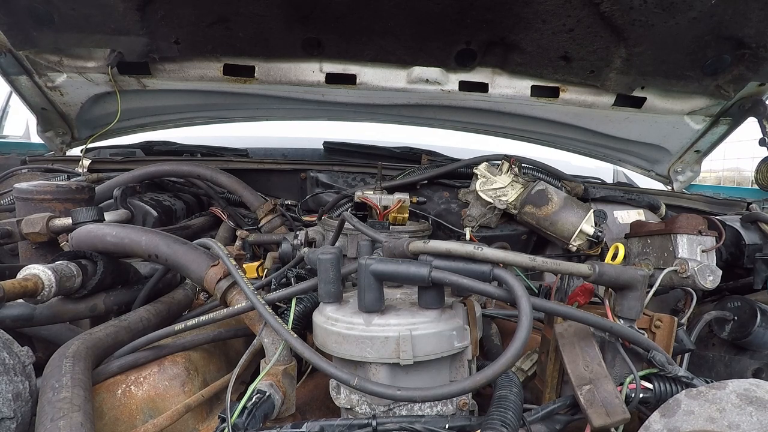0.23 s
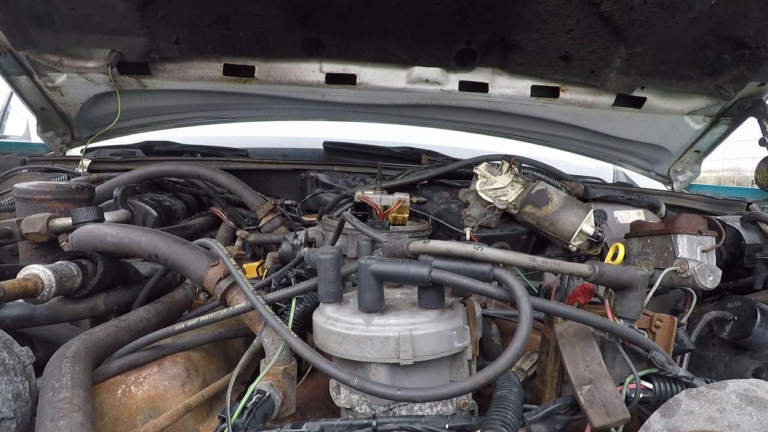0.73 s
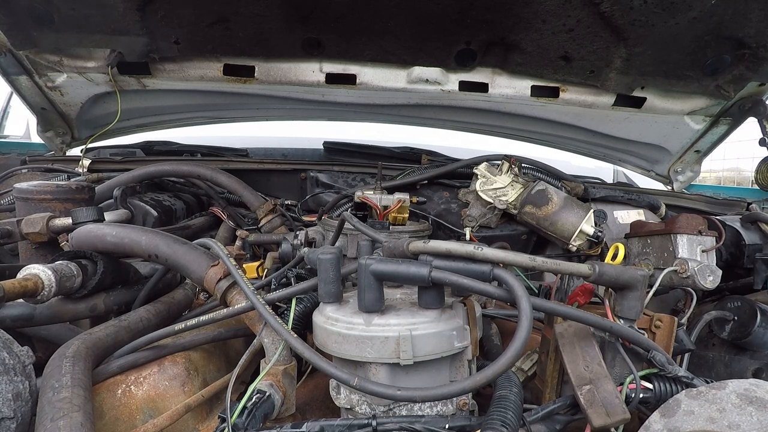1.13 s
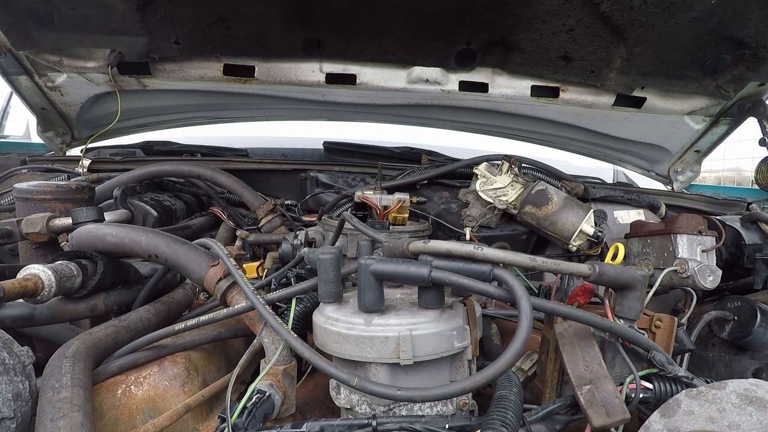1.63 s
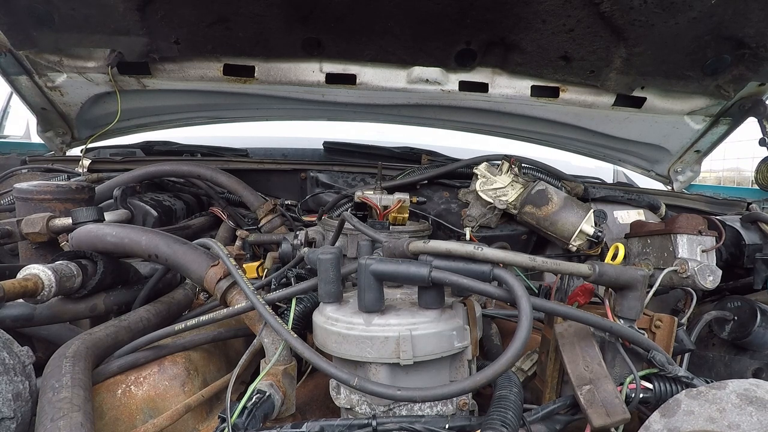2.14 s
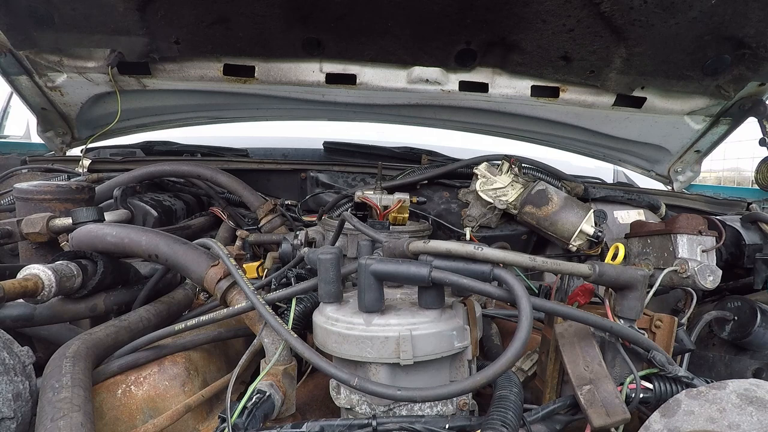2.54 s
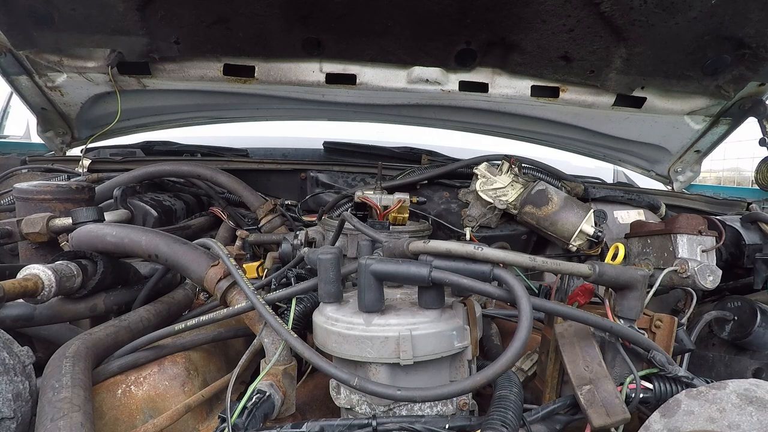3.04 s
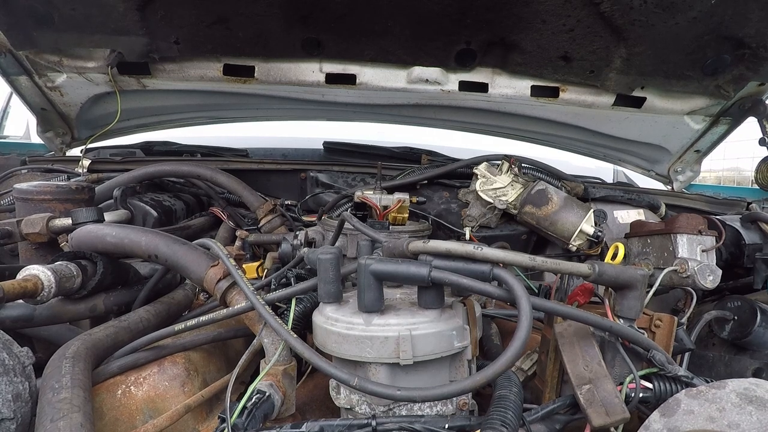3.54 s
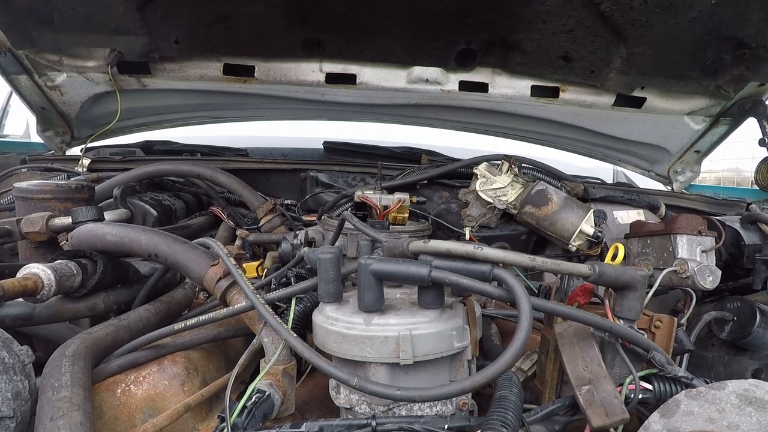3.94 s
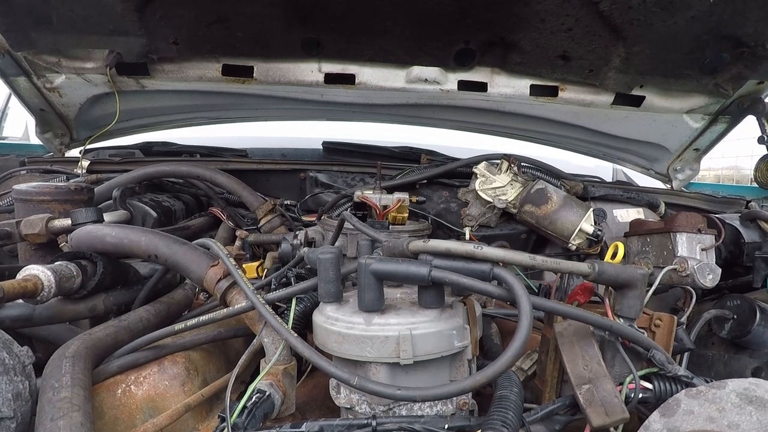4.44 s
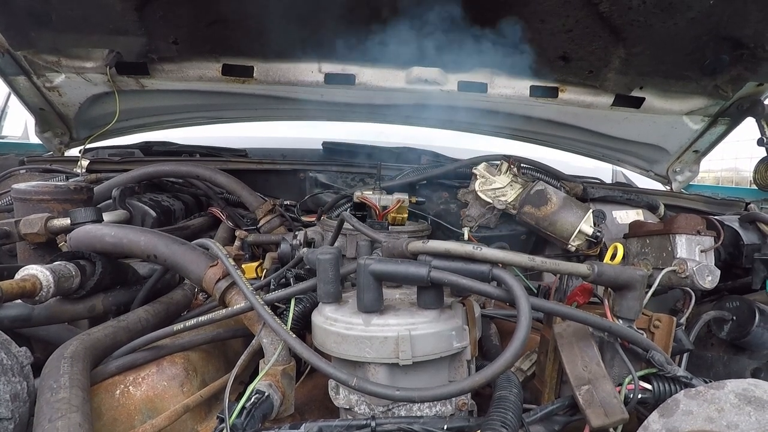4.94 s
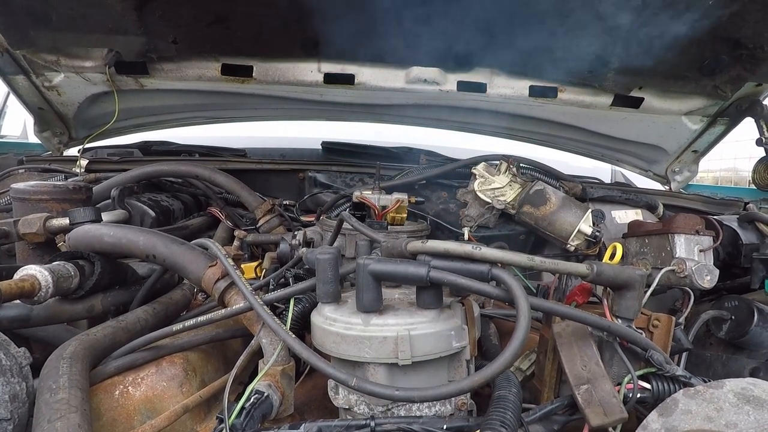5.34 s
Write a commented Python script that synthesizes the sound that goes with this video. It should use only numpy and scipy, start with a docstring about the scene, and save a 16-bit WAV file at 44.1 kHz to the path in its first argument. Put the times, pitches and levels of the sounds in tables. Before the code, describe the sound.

Close in an open engine bay, a blower hums steadily over faint hiss and a fading low rumble. Relays click sharply a few times. At about three seconds a solenoid clunks, the hum sags and the starter grinds, its teeth knocking rapidly in uneven surges. The engine shudders, thuds and spits back through the intake three times, but never catches.

```python
"""An open engine bay: a blower hums over air hiss and a fading rumble (coloured noise), and relays click
(bouncing contacts ring their cases). The starter then cranks a V8 that coughs but will not run: the blower
sags, and pinion teeth knock on the ring gear, faster and slower as cylinders come up on compression or half
fire. Gears grind, the nose rattles, the block shudders, the intake sucks (noise bands) and the exhaust thuds
(damped pressure dips); from 4.5 s the intake spits back three times (noise blasts on low pushes)."""
import sys
import numpy as np
from scipy import signal
from scipy.fft import rfft, irfft, next_fast_len
from scipy.io import wavfile

SR = 44100
rng = np.random.default_rng(int(sys.argv[2]) if len(sys.argv) > 2 else 0)


def store_wav(level_fs):
    """Save 16-bit WAV to argv[1]."""
    pcm = np.round(np.clip(np.atleast_2d(level_fs), -1, 1) * 32767)
    wavfile.write(sys.argv[1], SR, pcm.T.astype(np.int16))


N = 246078
T = np.arange(N) / SR
STARTER_ON_S = 3.057

# cranking noise: (time [s], gear grind level [dB], intake hiss level [dB])
CRANKING_LEVELS = [(3.09, -32, -49), (3.13, -25.5, -47), (3.39, -27.5, -41), (3.54, -30.5, -35),
                   (3.59, -25.5, -31), (3.7, -22.5, -34), (3.77, -30, -58), (3.89, -28.5, -50),
                   (3.97, -32.5, -47.5), (4.16, -36.5, -44), (4.22, -40, -40.5), (4.36, -37, -40),
                   (4.5, -44, -43.5), (4.59, -42.5, -43), (4.78, -56, -39.5), (4.98, -47.5, -45),
                   (5.47, -44.5, -47), (5.51, -50, -42), (5.58, -51.5, -73)]
# modes of the bell housing, before each source scales them: (frequency [Hz], width [Hz], rise [dB])
HOUSING_MODES = [(295, 34, 10), (350, 25, 8.5), (417.9, 12.3, 6.5), (565, 130, 11), (670, 120, -1),
                 (791.6, 49.4, 9.5), (942, 18, 5), (1047, 34, 2.5), (1224, 102, 7.5), (1387, 21, -3),
                 (1484, 294, 0.5), (1689, 49, 6), (2060, 60, 3), (2310, 60, 4), (2490, 94, 8.5),
                 (2656, 40, 6.5), (2775, 93, 8), (2940, 66, 7), (3280, 36, 10.5), (3720, 200, 11),
                 (4210, 360, 8)]


def amp(db):
    """Logarithmic level law: decibels to amplitude gain."""
    return 10 ** (np.asarray(db) / 20)


def rms_one(x):
    """Power normalisation: scales a signal to rms 1."""
    return x / np.sqrt(np.mean(x ** 2) + 1e-20)


def in_time(rows):
    """Linear interpolation: each column of a table at every sample, against its first column of times."""
    s, *columns = np.transpose(rows)
    return [np.interp(T, s, column) for column in columns]


def noise():
    """White noise: independent Gaussian samples of rms 1."""
    return rng.standard_normal(N)


def drift(rate_hz):
    """Low-passed chance: two equal poles leave a slow random signal of rms 1."""
    pole = np.exp(-2 * np.pi * rate_hz / SR)
    settling = SR   # samples discarded while the filter settles
    slow = signal.lfilter([1], [1, -2 * pole, pole * pole], rng.standard_normal(N + settling))
    return rms_one(slow[settling:])


def colour(x, spectrum, peaks=()):
    """Minimum-phase filtering: a broad spectrum with resonant rises; white noise of rms 1 stays at rms 1."""
    size = 2 * next_fast_len(N // 2 + SR // 4)
    hz = np.fft.rfftfreq(size, 1 / SR) + 1   # the offset avoids log(0)
    corner_hz, corner_db = np.transpose(spectrum)
    db = np.interp(np.log(hz), np.log(corner_hz), corner_db)
    for centre_hz, width_hz, rise_db in peaks:
        db = db + rise_db / (1 + (2 * (hz - centre_hz) / width_hz) ** 2)
    cepstrum = irfft(np.log(rms_one(amp(db))), size)
    cepstrum[1:size // 2] *= 2      # folding the cepstrum gives the minimum phase
    cepstrum[size // 2 + 1:] = 0
    return irfft(rfft(x, size) * np.exp(rfft(cepstrum)), size)[:N]


def band(x, order, edges_hz, kind="band"):
    """Butterworth filtering: a pass band without ripple."""
    return signal.sosfilt(signal.butter(order, edges_hz, kind, fs=SR, output="sos"), x)


def ring(x, modes):
    """Modal superposition: each mode is a two-pole resonator that decays by 60 dB in its t60."""
    out = 0
    for hz, level_db, t60 in modes:
        pole, turn = amp(-60 / (t60 * SR)), 2 * np.pi * hz / SR
        poles = [1, -2 * pole * np.cos(turn), pole * pole]
        out = out + amp(level_db) * signal.lfilter([0, np.sin(turn)], poles, x + 1e-18)
    return out


def burst(start, length, rise):
    """Transient envelope: exponential growth over a share of its length, then Gaussian decay."""
    u = np.clip(T - start, 0, None) / length
    return (1 - np.exp(-u / rise)) * np.exp(-u ** 2)


def swell(start, length, early):
    """Squared-sine envelope: an arch over its length, its peak moved early by an exponent below 1."""
    return np.sin(np.pi * np.clip((T - start) / length, 0, 1) ** early) ** 2


def starter_gate():
    """Onset envelope: a linear rise over 19 ms once the starter is switched on."""
    return np.clip((T - STARTER_ON_S) / 0.019, 0, 1)


def held_back():
    """Compression work: the share of crank speed lost builds up to each compression, then lets go."""
    # (slowest moment [s], share of speed lost [0-1])
    compressions = [(3.254, 0.31), (3.38, 0.21), (3.488, 0.2), (4.003, 0.19), (4.109, .17), (5.049, 0.05),
                    (5.237, 0.22), (5.35, 0.14), (5.453, 0.27)]
    slowing_s, recovery_s = .05, .045   # before and after the slowest moment
    lost = 0
    for s, share in compressions:
        distance = np.where(T < s, (s - T) / slowing_s, (T - s) / recovery_s)
        lost = np.maximum(lost, share * (1 - np.clip(distance, 0, 1)))
    return lost


def far_rumble():
    """Low-frequency broadband noise: a rumble outside that fades."""
    # fading: (time [s], level [dB])
    fading = [(0, -53), (1.5, -66), (3.05, -74)]
    # spectrum: (frequency [Hz], relative density [dB])
    spectrum = [(15, 3), (30, -2), (100, -0.5), (130, -18), (600, -102)]
    return amp(in_time(fading)[0]) * colour(noise(), spectrum)


def air():
    """Stationary noise: the faint steady hiss of air and microphone."""
    # spectrum: (frequency [Hz], relative density [dB])
    spectrum = [(1760, -25), (3000, -27), (3380, -9.5), (4820, -8.5), (7600, -7.5), (9830, -9.5),
                (13300, -24), (14500, -66)]
    return amp(-67.5) * colour(noise(), spectrum)


def blower():
    """Duct resonance: turbulent air excites it; the fan sags when the starter draws the battery down."""
    # turbulence: (frequency [Hz], relative density [dB])
    turbulence = [(59, -95), (100, -33), (153, -6.5), (342, -4), (379, -9.5), (432, -4.5), (507, -12.5),
                  (680, -16), (775, -9.5), (1040, -14.5), (1500, -14.5), (2350, -26), (2750, -34.5),
                  (3300, -41), (6000, -61.5)]
    # duct resonances: (frequency [Hz], width [Hz], rise [dB])
    duct = [(174.4, 6.7, 4.5), (245.3, 3.2, 7.5), (440.2, 39, 9), (574, 120, 12), (773, 27, 7),
            (867, 330, 2), (1527, 41, 8.5)]
    level_db, sag_db = -37, -19.5
    sag = np.clip((T - STARTER_ON_S) / 0.16, 0, 1)   # complete in 0.16 s
    unsteady = noise() * amp(0.45 * drift(39))
    return amp(level_db + sag_db * sag) * colour(unsteady, turbulence, duct)


def relays():
    """Impact excitation: contacts bounce in uneven chatter that rings the case; armatures knock brackets."""
    # relays and starter solenoid, levels before filtering and ringing:
    # (time [s], chatter level [dB], chatter length [s], case strike level [dB], bracket knock level [dB])
    clicks = [(1.207, -5, 0.0026, -42, -26), (1.2113, -7.5, 0.0055, -36, -39),
              (1.219, -26, 0.0072, -65, -40), (1.228, -40, 0.022, -55, -32),
              (1.3194, -46, 0.012, -54.5, -55), (2.332, -28, 0.0085, -54, -30),
              (3.0572, -8, 0.0036, -53, -3.5), (3.058, -19, 0.017, -71, -10.5),
              (3.159, -30, 0.0099, -51, -21), (5.474, -52, 0.0096, -54, -18),
              (5.484, -58, 0.049, -79, -26.5)]
    # modes of the case: (frequency [Hz], level [dB], t60 [s])
    case = [(975, -10, .17), (2700, -3, .022), (3890, -9, .012), (5450, -8, .008), (6300, -6, .01),
            (7880, -4, .01), (9500, -8, .008)]
    # modes of the bracket, before a common cut of 16 dB: (frequency [Hz], level [dB], t60 [s])
    bracket = [(380.5, -4, 0.075), (726, 1.5, 0.019), (950, -14.5, 0.026), (1870, 3.5, 0.0024),
               (2520, 0.5, 0.006)]
    bounces_per_s = 9000.0
    bounces = noise() * (rng.random(N) < bounces_per_s / SR)
    chatter, strikes, knocks = np.zeros((3, N))
    for s, chatter_db, length, strike_db, knock_db in clicks:
        chatter += amp(chatter_db) * burst(s, length, 0.96) * bounces
        strikes += amp(strike_db) * burst(s, length, 0.14) * bounces
        knocks += amp(knock_db) * burst(s, length, 0.25) * bounces
    blunt = band(knocks, 2, [220, 1500])   # a blunt blow on a small bracket
    crack = band(chatter, 3, [1800, 9500])
    return ring(strikes, case) + crack + amp(-16) * ring(blunt, bracket)


def thuds(cycles):
    """Damped oscillation: half-fired cylinders dip the exhaust pressure; the rebound dies in a few cycles."""
    # (time [s], level before the envelope [dB], pitch [Hz])
    half_firings = [(3.63, -18, 35.6), (3.673, -19, 37.06), (3.694, -35, 71.15), (4.336, -18.5, 38.95),
                    (4.498, -23, 55), (4.615, -20.5, 75), (4.633, -29, 61), (4.742, -22, 45),
                    (4.773, -35, 35), (4.805, -26, 25.2), (5.522, -33, 60)]
    out = 0
    for s, db, hz in half_firings:
        turns = np.clip(T - s, 0, None) * hz
        envelope = (1 - np.exp(-6.0 * turns)) * np.exp(-turns / cycles)
        out = out - amp(db) * np.sin(2 * np.pi * turns) * envelope
    return out


def exhaust_throb():
    """Low-frequency pressure noise: the exhaust throbs at a varying level."""
    # (time [s], level [dB])
    levels = [(3.13, -57), (3.23, -46), (3.54, -45), (3.7, -24.5), (3.77, -28), (3.88, -40), (4.1, -45.5),
              (4.22, -39.5), (4.4, -33.5), (4.6, -35.5), (4.8, -35.5), (5.04, -41.5), (5.15, -44.5),
              (5.47, -32), (5.58, -33)]
    # spectrum: (frequency [Hz], relative density [dB])
    spectrum = [(15, -33), (32, 4), (60, -14.5), (88, -0.5), (130, -9), (600, -101)]
    return starter_gate() * amp(in_time(levels)[0]) * colour(noise(), spectrum)


def block_shudder():
    """Mount vibration: low noise shivers continuously, and each jolt of the block rises, holds and dies."""
    # shiver between jolts: (time [s], level [dB])
    shiver = [(3.1, -27), (3.3, -37.5), (4.0, -48), (4.5, -46), (5.05, -50.5), (5.2, -48), (5.4, -40.5),
              (5.58, -44)]
    # jolts on the mounts: (time [s], level [dB], time from onset to decay [s])
    jolts = [(3.07, -31, 0.036), (3.68, -29.5, 0.22), (3.93, -32, 0.0089), (4.34, -46, 0.062),
             (4.515, -30, 0.011), (4.61, -44, 0.016), (4.7, -48, 0.146), (5.321, -42, 0.097),
             (5.485, -32, 0.061)]
    # spectrum: (frequency [Hz], relative density [dB])
    spectrum = [(60, -17), (110, -19), (140, 5), (175, 13.5), (205, 4), (275, 0), (330, -3), (500, -1),
                (2000, -100)]
    rise_s, fall_s = 0.011, 0.0056
    strength = amp(in_time(shiver)[0])
    for s, db, held in jolts:
        rise = np.clip((T - s) / rise_s, 0, 1)
        strength = strength + amp(db) * rise * np.exp(-np.clip(T - s - held, 0, None) / fall_s)
    return starter_gate() * strength * colour(noise(), spectrum)


def intake():
    """Flow noise: air hisses through the carburettor, less while the crank is held back, with a thin leak."""
    # hiss spectrum: (frequency [Hz], relative density [dB])
    hiss_spectrum = [(1290, -1), (2200, -6), (2730, -11), (3360, -9), (4810, -10), (6210, -9), (9470, -14),
                     (11500, -26.5), (15000, -71), (22000, -120)]
    # the carburettor throat sings faintly: (frequency [Hz], width [Hz], rise [dB])
    throat = [(1705, 60, 13)]
    # leak spectrum: (frequency [Hz], relative density [dB])
    leak_spectrum = [(8000, -64), (11000, -16), (13000, -2), (14500, -16), (15600, -10)]
    # thin leak above the hiss in frequency: (time [s], level against the hiss [dB])
    leak_over_hiss = [(3.54, -44), (3.59, -25), (3.7, -32), (3.77, -33), (4.16, -24), (4.24, -15),
                      (4.36, -18), (4.9, -19), (5.5, -17)]
    held_db = -11   # change per whole share of speed lost
    _, hiss_db = in_time(CRANKING_LEVELS)
    leak_db = hiss_db + in_time(leak_over_hiss)[0]
    gusts_db = 2.2 * drift(16) + held_db * held_back()
    hiss = amp(hiss_db + gusts_db) * colour(noise(), hiss_spectrum, throat)
    leak = amp(leak_db + gusts_db) * colour(noise(), leak_spectrum)
    return starter_gate() * (hiss + leak)


def spits(ragged_db):
    """Pulsed jet noise: gas spat back through the intake, a ragged blast riding on a low pressure push."""
    # (time [s], blast level before a cut of 10.5 dB [dB], rise [s], fall [s], push level [dB], push pitch [Hz])
    blasts = [(4.5133, -10, 0.0021, 0.011, -17, 105), (4.703, -13, 0.018, 0.012, -23, 124),
              (4.873, -15.5, 0.0046, 0.0096, -23.5, 109)]
    # gas noise: (frequency [Hz], relative density [dB])
    spectrum = [(90, -32), (180, -4), (300, 0.5), (688, -4), (1710, -3.5), (2390, -8.5), (3210, 1),
                (4330, -7), (8550, -4.5), (11200, -13), (14300, -7), (15800, -17)]
    # manifold runners: (frequency [Hz], width [Hz], rise [dB])
    runners = [(550, 98, 5), (884, 89, 9), (1145, 100, 10.5), (1770, 220, 13)]
    push_s = .026   # each rise time is added to this
    envelope, push = np.zeros((2, N))
    for s, db, rise, fall, push_db, hz in blasts:
        dying = np.exp(-np.clip(T - s - rise, 0, None) / fall)
        envelope += amp(db - 10.5) * np.where(T < s + rise, swell(s, 2 * rise, 0.63), dying)
        push += amp(push_db) * swell(s, push_s + rise, 0.4) * np.sin(2 * np.pi * hz * (T - s))
    ragged = noise() * amp(ragged_db * drift(140))
    return envelope * colour(ragged, spectrum, runners) + push


def rattle():
    """Random impact excitation: the lightly loaded pinion rings the starter's nose, each mode in spells."""
    # level before load quiets it: (time [s], level [dB])
    levels = [(3.1, -53), (3.6, -55), (3.78, -66), (4.2, -62), (4.45, -47.5), (4.62, -68), (4.8, -41),
              (5.0, -48.5), (5.3, -48), (5.5, -48), (5.57, -61)]
    # modes of the nose, before the sum is scaled to rms 1: (frequency [Hz], level [dB], t60 [s])
    nose = [(1197, -17, 0.037), (1717, -0.5, 0.054), (1816, -13, 0.028), (2120, -22, 0.026),
            (2530, -27, 0.036), (2760, -6, 0.049), (2870, -6.5, 0.028), (3125, -4.5, 0.046),
            (3240, -12, .025), (3584, -9.5, 0.1), (3900, -4, 0.029), (4240, -6, .025), (4950, -7, .02),
            (5370, -9, .02), (6300, -25, .02)]
    knocks_per_s = 500
    held_db = -16   # load quiets the rattle: change per whole share of speed lost
    struck = rng.random(N) < knocks_per_s / SR
    rings = 0
    for mode in nose:
        uneven = struck * noise() * amp(1.4 * drift(21))
        rings = rings + ring(uneven, [mode])
    level_db = in_time(levels)[0] + held_db * held_back()
    return (T > STARTER_ON_S) * amp(level_db) * rms_one(rings)


def gear_grind():
    """Friction excitation: rough rubbing metal drives the modes of the bell housing."""
    # spectrum: (frequency [Hz], relative density [dB])
    spectrum = [(120, -53.5), (220, -25.5), (350, -13.5), (500, -8), (800, 1.5), (1200, -0.5), (1900, -11),
                (2700, -23.5), (4000, -51), (6000, -33), (12000, -110)]
    grind_db, _ = in_time(CRANKING_LEVELS)
    rubbing = amp(grind_db + 1.47 * drift(17)) * noise()
    modes = np.array(HOUSING_MODES) * [1, 1, 1.4]   # long rubbing rings the modes higher
    return starter_gate() * colour(rubbing, spectrum, modes)


def pinion(jitter, runout, uneven_db, worn_db, scatter_db):
    """Gear-mesh impacts: one uneven knock per tooth, early or late; silent when the engine outruns it."""
    # one table for each spell of driving, before compression, scatter and a common lift of the soft knocks:
    # (time [s], unhindered tooth rate [Hz], knock level [dB], bite of hard contact against the knock [dB])
    mesh = [
        [(3.08, 249.7, -40.5, -9), (3.15, 365, -31, 3), (3.195, 386.7, -33, 8), (3.325, 408.4, -29.5, 4),
         (3.435, 440, -30, 8), (3.55, 560, -31, 8), (3.6, 673.8, -43, 14), (3.64, 886.3, -37, 8),
         (3.72, 875, -35, 8)],
        [(3.88, 253.5, -41.5, 13), (3.94, 408, -31.5, 8.5), (4.06, 435.2, -35.5, 4), (4.15, 457.5, -35.5, 4),
         (4.2, 554.6, -45.5, 7), (4.276, 650, -49, 10.5), (4.322, 914, -47.5, -6), (4.356, 835, -39.5, 11.5),
         (4.398, 775, -36, 6), (4.422, 670, -45, 8), (4.45, 610, -37.5, 12), (4.485, 565.6, -36, -3),
         (4.505, 527.3, -44, 11.5), (4.55, 500, -40, 8), (4.6, 451, -54, -13)],
        [(4.75, 868.5, -57, 19), (4.785, 798.4, -41, 4.5), (4.82, 740, -44.5, -3), (4.85, 620, -49, 16),
         (4.883, 577.8, -39.5, -3), (4.95, 446, -45, -11), (5.0, 419, -44.5, 6), (5.09, 412, -46, 7.5),
         (5.18, 415.5, -39, 5), (5.296, 413, -37.5, -8), (5.405, 419.7, -37.5, -17), (5.496, 392, -39, -29),
         (5.53, 372, -64, -12)],
    ]
    # one tooth knock: (frequency [Hz], relative density [dB])
    spectrum = [(100, -56), (250, 4.5), (400, 3), (800, 0.5), (1200, -4), (1900, -9), (2700, -25),
                (3700, -35.5), (5500, -25), (12000, -100)]
    pinion_teeth = 9
    held_knock_db, held_bite_db = -21, -8   # change per whole share of speed lost
    soft, hard = np.zeros((2, N))
    wobble = drift(28)
    uneven, scatter = uneven_db * drift(21), scatter_db * noise()
    lost = held_back()
    for rows in mesh:
        hz, level_db, bite_db = in_time(rows)
        hz = hz * (1 - lost)
        level_db = level_db + held_knock_db * lost
        bite_db = bite_db + held_bite_db * lost
        passed = np.cumsum(hz) / SR   # teeth gone by
        off_centre = np.sin(2 * np.pi * passed / pinion_teeth)   # once a turn it leads and presses harder
        slack = jitter * (hz / 400) ** 3.4   # unloaded at speed, the teeth rattle in their backlash
        loose = np.clip(hz / 400, 1, None) ** 1.2   # and strike less evenly
        teeth = np.floor(passed + slack * wobble + runout * off_centre)
        struck = np.diff(teeth, prepend=0) > 0
        engaged = np.clip(np.minimum(T - rows[0][0], rows[-1][0] - T) / 0.0039, 0, 1)
        strength = amp(level_db + uneven + scatter * loose + worn_db * off_centre)
        knocks = engaged * strength * struck * np.sqrt(SR / hz)   # evens out power over tooth rate
        soft += knocks
        hard += knocks * amp(bite_db)
    overtones = band(hard, 3, 650, "high")
    modes = np.array(HOUSING_MODES) * [1, 1.3, 1.3]   # knocks are heard mostly where they meet a mode
    return colour(amp(5.5) * soft + overtones, spectrum, modes)


def bay(x, t60, wet_db, low_hz):
    """Reverberation: dense short reflections between block, wings and hood smear the upper partials."""
    t = T[:SR // 8]
    tail = rng.standard_normal(len(t)) * amp(-60 * t / t60) * (t > .001)
    tail = band(tail / np.sqrt(np.sum(tail ** 2)), 2, low_hz, "high")
    return x + amp(wet_db) * signal.fftconvolve(x, tail)[:N]


def scene():
    """Linear superposition: everything as one microphone in the bay hears it."""
    steady = far_rumble() + air() + blower()
    engine = thuds(cycles=1.0) + exhaust_throb() + block_shudder() + intake() + spits(ragged_db=1.5)
    # jitter (at 400 teeth per second) and runout are shares of a tooth
    teeth = pinion(jitter=.034, runout=.03, uneven_db=1.8, worn_db=1.5, scatter_db=2.0)
    teeth = bay(teeth, t60=.05, wet_db=-1, low_hz=1500)
    return (steady + relays() + engine + rattle() + gear_grind() + teeth)[None]


def record(dry):
    """Band limitation: a steep low-pass, 90 dB down from 16400 Hz upward."""
    return signal.sosfilt(signal.cheby2(14, 90, 16400, fs=SR, output="sos"), dry)


dry = scene()
out = record(dry)
store_wav(out)
```